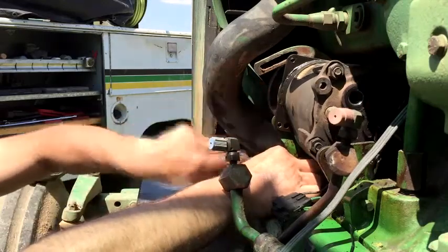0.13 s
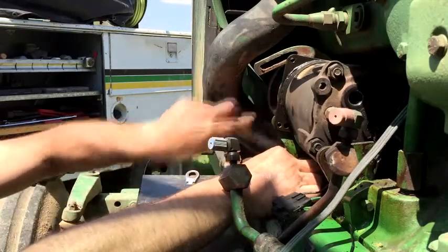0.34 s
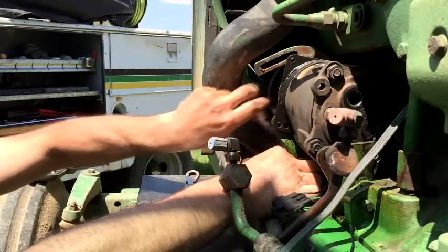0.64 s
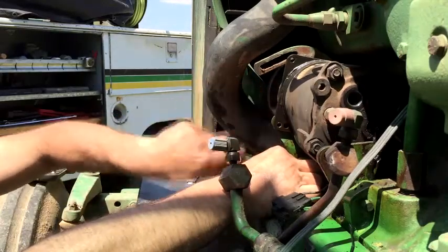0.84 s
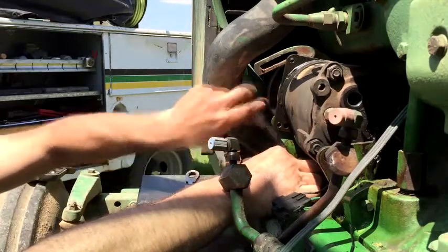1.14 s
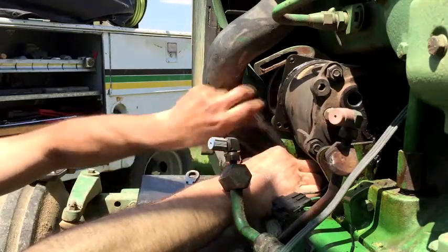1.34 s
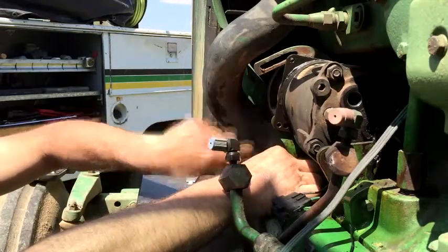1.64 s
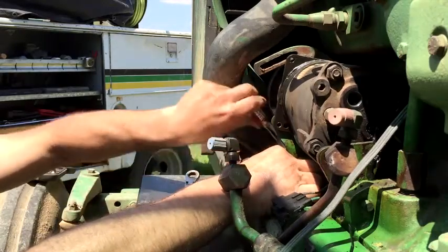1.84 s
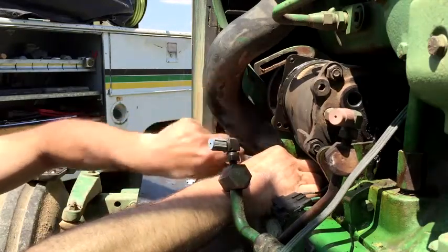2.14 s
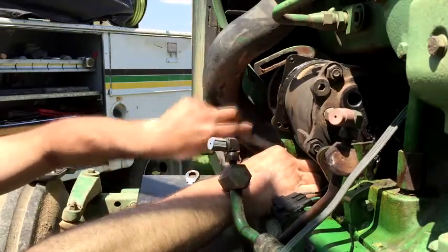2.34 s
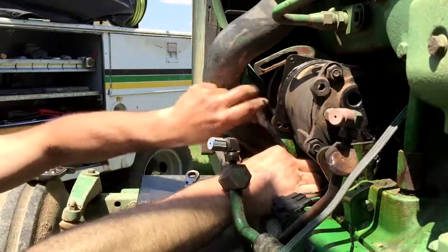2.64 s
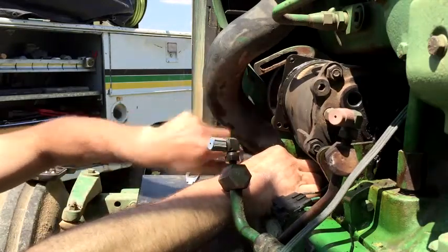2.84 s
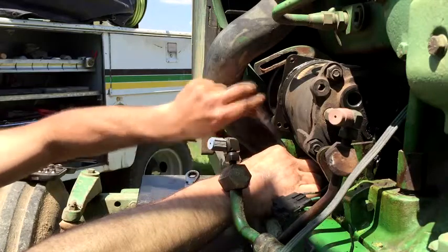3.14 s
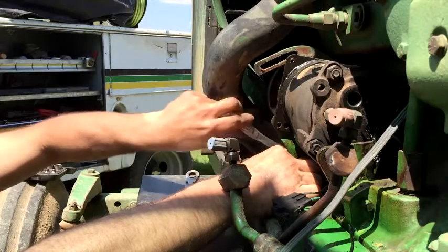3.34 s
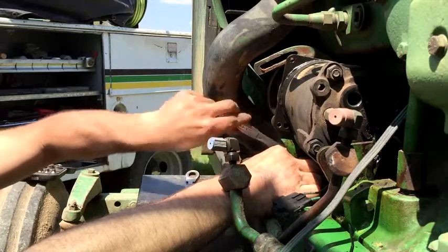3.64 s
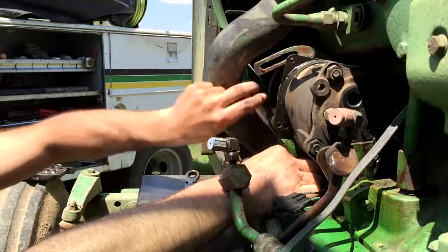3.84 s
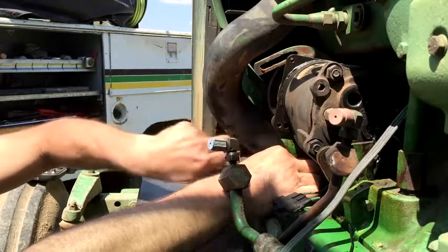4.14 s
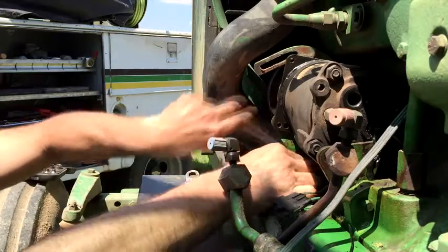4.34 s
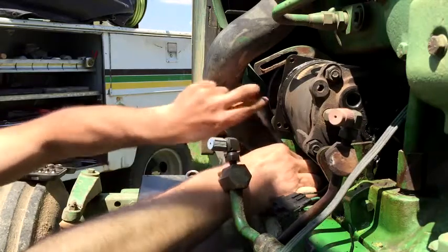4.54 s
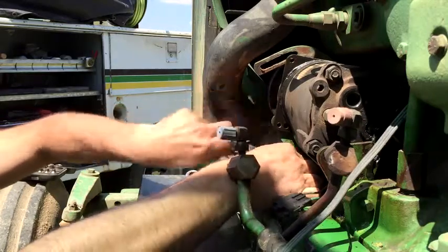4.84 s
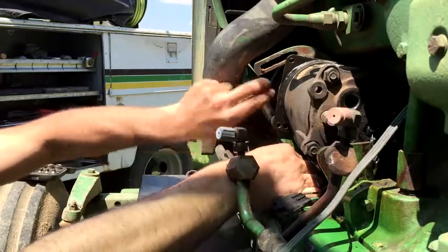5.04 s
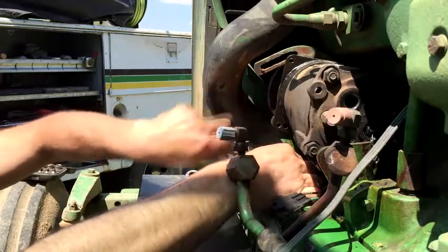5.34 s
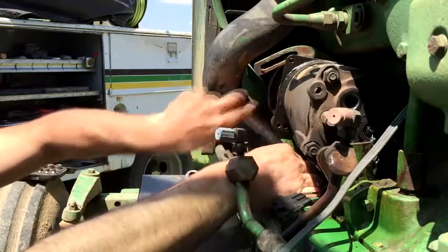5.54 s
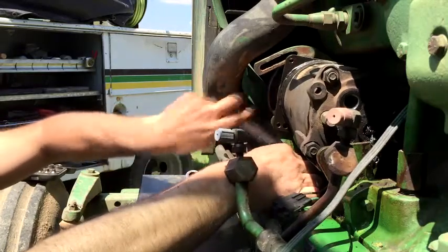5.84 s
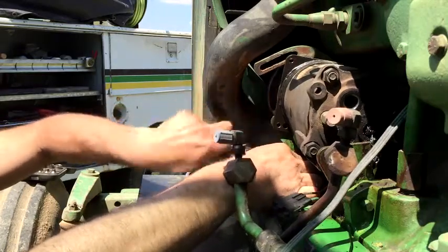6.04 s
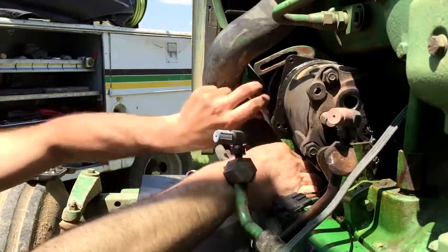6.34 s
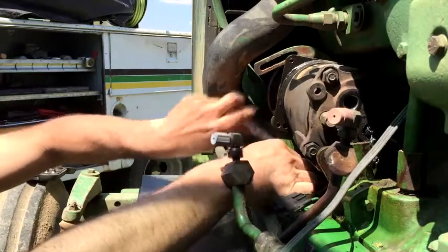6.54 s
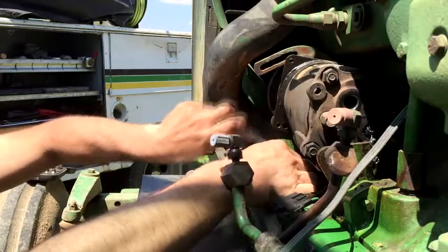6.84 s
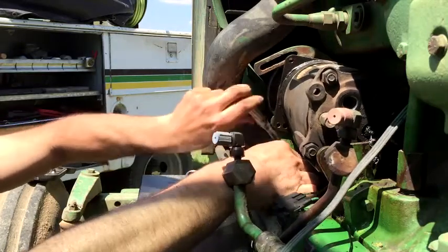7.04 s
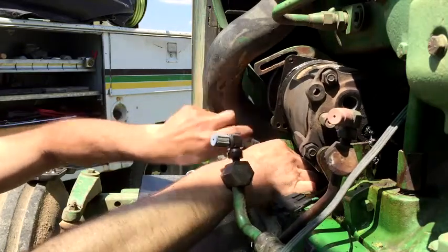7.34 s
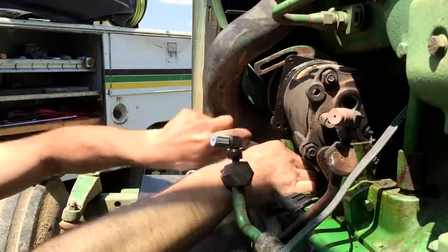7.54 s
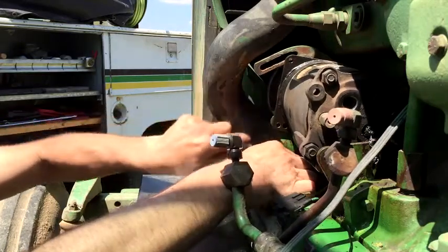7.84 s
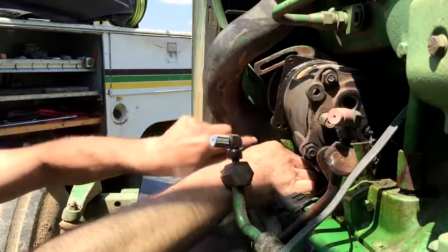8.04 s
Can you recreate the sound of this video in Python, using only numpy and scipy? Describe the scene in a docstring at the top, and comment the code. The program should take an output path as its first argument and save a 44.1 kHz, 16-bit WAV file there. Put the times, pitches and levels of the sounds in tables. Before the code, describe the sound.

A ratchet wrench works a bolt on a tractor engine close to the microphone, outdoors. Each swing gives a quick run of three or four crisp clicks, about every two thirds of a second, with dull knocks, small scrapes and metal clanks between. A faint motor hum fades early, then a distant vehicle drones past with soft tyre noise. Two louder ringing clanks come in the second half.

```python
"""A ratchet wrench works a bolt loose on a tractor engine, outdoors.
Each back swing drags the pawl over a few teeth, and each impact excites the modes of the steel head.
At the turns the socket clanks on the bracket, scrapes, or takes up the load with a dull knock.
Farther off a motor hum fades, and an eight-cylinder engine drones past in a wash of tyre noise,
its pitch lowered by the Doppler effect and its level throbbing by interference with an echo."""
import sys
import numpy as np
from scipy import signal
from scipy.fft import rfft, irfft
from scipy.io import wavfile
from scipy.ndimage import uniform_filter1d

SR = 44100
rng = np.random.default_rng(int(sys.argv[2]) if len(sys.argv) > 2 else 0)


def master_out(mix):
    """Clip the mix to full scale and print it as 16-bit PCM to the path in sys.argv[1]."""
    frames = np.transpose(np.atleast_2d(mix))
    ceiling = np.clip(frames, -1, 1)
    pcm = np.round(ceiling * 32767).astype(np.int16)
    wavfile.write(sys.argv[1], SR, pcm)


N = 361179
TIME = np.arange(N) / SR
HIT = np.arange(SR // 2) / SR  # t/s since an impact


def amp(db):
    """Amplitude ratio of a level in decibels."""
    return 10 ** (np.asarray(db) / 20)

def unit(x):
    """Normalisation to unit rms."""
    return x / np.sqrt(np.mean(x ** 2) + 1e-20)

def unit_attack(x):
    """Normalisation to unit rms over the first five milliseconds."""
    return x / np.sqrt(np.mean(x[:220] ** 2) + 1e-20)

def curves(rows):
    """Linear interpolation of a table's columns over time."""
    times, *columns = np.transpose(rows)
    return [np.interp(TIME, times, column) for column in columns]

def add(mix, at_s, sound):
    """Superposition of a sound from a given time on."""
    part = mix[max(round(at_s * SR), 0):][:len(sound)]
    part += sound[:len(part)]

def noise(spectrum, size=len(HIT)):
    """White noise shaped by a spectral envelope, at unit rms."""
    hz, db = np.transpose(spectrum)
    gain = amp(np.interp(np.log(np.fft.rfftfreq(size, 1 / SR) + 1), np.log(hz), db))
    return unit(irfft(rfft(rng.standard_normal(size)) * gain, size))

def band(x, hz, kind):
    """Fourth-order low-pass or high-pass filter."""
    return signal.sosfilt(signal.butter(4, np.clip(hz, 100, SR / 2 - 1), kind, fs=SR, output="sos"), x)

def drift(per_s):
    """Random fluctuation: straight lines between Gaussian values."""
    steps = rng.standard_normal(1024)
    return np.interp(TIME * per_s, np.arange(len(steps)), steps)

def swell(at_s, width_s):
    """Gaussian envelope with a peak of one."""
    return np.exp(-((TIME - at_s) / width_s) ** 2)

def rise(tau_s):
    """Exponential approach to full amplitude."""
    return 1 - np.exp(-HIT / tau_s)

def fade(t60):
    """Exponential decay by 60 dB in t60 seconds."""
    return amp(-60 * HIT / max(t60, 1e-3))

def mode(hz, t60, start_cycles=0):
    """Free vibration of a damped oscillator."""
    return fade(t60) * np.sin(2 * np.pi * (hz * HIT + start_cycles))

def ring(modes):
    """Modal superposition: the striking point sets the modes' shares; the grip detunes them a little."""
    hz, db, t60 = np.transpose(modes)
    db = db + 3 * rng.standard_normal(len(db))
    hz = hz * (1 + .01 * rng.standard_normal(len(hz)))
    contact = 1 - np.exp(-(HIT * hz.max() / 2) ** 2)  # low-pitched bodies start more softly
    return unit_attack(contact * sum(amp(d) * mode(f, t, rng.random()) for f, d, t in zip(hz, db, t60)))


def hum(hz=89.7, level_db=-38.5, fades_at_s=2.2, fade_db_per_s=12.5):
    """Periodic vibration of a far motor: a fundamental and a weak octave hold, then fade."""
    db = level_db - fade_db_per_s * np.maximum(TIME - fades_at_s, 0)
    phase = 2 * np.pi * np.cumsum(hz * (1 + .0038 * drift(4))) / SR
    return np.sqrt(2) * amp(db + drift(4)) * (np.sin(phase) + amp(-15) * np.sin(2 * phase))


# harmonics of the engine cycle; 8 is the firing note, unequal cylinders fill in: number, relative level/dB
EXHAUST_HARMONICS = [(4, -34.5), (5, -8.5), (6, -26), (7, -18.5), (8, -0.02), (9, -14), (10, -26.5),
                     (11, -24), (12, -29.5), (13, -27), (14, -38.5), (15, -32), (16, -19.5), (18, -37),
                     (19, -29.5), (20, -36.5), (21, -33.5), (24, -40)]
# swells and dips of single harmonics: number, t/s, half width/s, gain/dB
HARMONIC_SWELLS = [(5, 3.1, .8, -7), (5, 5.3, 1.4, 3.5), (8, 4.4, 0.28, 4), (8, 7.11, 0.54, 4),
                   (8, 7.85, 0.13, -4), (9, 2.3, 1.1, 10.5), (9, 5.9, 1.2, -20.5), (11, 3.42, 1.28, 20.5),
                   (16, 2.9, .7, -3), (16, 5.164, 0.39, 14.5), (16, 7.45, 0.48, 5.5), (18, 6.7, 0.65, 11),
                   (24, 6.78, 0.51, 12.5)]
# spectrum of the engine's rumble: f/Hz, relative level/dB
RUMBLE_SPECTRUM = [(20, -53.5), (30, -38), (42, -12.5), (65, 1.5), (85, 1), (125, 0.5), (170, -6.5),
                   (250, -12.5), (380, -28), (470, -28), (600, -44), (2000, -83)]

def engine(firing_hz=119, speed_m_per_s=25, distance_m=60, abreast_s=4.85, sound_m_per_s=343):
    """Doppler shift and spherical spreading of a passing exhaust; interference with an echo throbs."""
    along_m = speed_m_per_s * (TIME - abreast_s)
    range_m = np.hypot(along_m, distance_m)
    receding = along_m / range_m  # -1 far ahead, +1 far past
    heard_hz = firing_hz * (1 - receding * speed_m_per_s / sound_m_per_s)
    cycle = 2 * np.pi * np.cumsum(heard_hz * (1 + .002 * drift(7))) / SR / 8  # eight firings a cycle
    echo_phase = 2 * np.pi * (15.1 * receding - .26) / 8  # the extra path changes with the bearing
    screened = .5 - .5 * np.tanh((TIME - 2.39) / .086)  # hidden from the listener at first
    rearward_db = 5.5 * receding  # the tailpipe is louder from behind
    pass_db = 20 * np.log10(distance_m / range_m) + rearward_db - 13 * screened
    facing = swell(5.66, .77)  # the tailpipe is brightest just after it draws level
    drone = np.zeros(N)
    for k, db in EXHAUST_HARMONICS:
        start = 2 * np.pi * rng.random()
        above_firing = max(k - 8, 0)
        waver_db = (.5 - .054 * db) * unit(drift(1.303) + drift(11))  # weak harmonics waver more
        swell_db = sum(gain * swell(s, width) for line, s, width, gain in HARMONIC_SWELLS if line == k)
        bright_db = .55 * above_firing * facing
        direct = np.sin(k * cycle + start)
        echo = amp(-12.5 - 1.5 * above_firing) * np.sin(k * (cycle + echo_phase) + start)
        drone += np.sqrt(2) * amp(db + swell_db + waver_db + bright_db) * (direct + echo)
    rumble = amp(-38 + .2 * pass_db) * noise(RUMBLE_SPECTRUM, N)
    return amp(-25.5 + pass_db) * drone + rumble


# envelope of the road noise: t/s, relative level/dB
ROAD_ENVELOPE = [(0.0, -55), (0.34, -53.5), (1.71, -57), (3.65, -53.5), (4.22, -51), (5.75, -49),
                 (8.19, -56)]
# spectra of the tyres' low wash, high hiss and midrange roar: f/Hz, relative level/dB
WASH_SPECTRUM = [(100, -1), (300, 5.5), (400, -3.5), (520, -2.5), (650, 3), (780, 0), (1050, 4),
                 (1400, -4.5), (1800, -8.5), (2500, -16.5), (5000, -54)]
HISS_SPECTRUM = [(1000, 2), (2400, -9.5), (3500, 0.5), (5000, -6), (6500, -7.5), (8000, -12.5),
                 (9500, -12.5), (11000, -17), (15500, -17.5), (16500, -30.5)]
ROAR_SPECTRUM = [(500, -36.5), (800, -3), (1100, 5), (1350, -6), (1800, -10.5), (2400, -15), (3200, -19),
                 (4500, -24.5), (8000, -54)]

def road(waver_db=2.52):
    """Broadband tyre noise swells as the vehicle passes; moving air modulates each band's amplitude."""
    (level_db,) = curves(ROAD_ENVELOPE)
    wash = amp(level_db + 4.5) * noise(WASH_SPECTRUM, N)
    hiss = amp(-43 + .43 * level_db + .8 * drift(47)) * noise(HISS_SPECTRUM, N)
    roar = amp(-68 + 20.5 * swell(7.25, 1.7)) * noise(ROAR_SPECTRUM, N)  # comes after the engine
    bands = signal.stft(wash + hiss + roar, nperseg=1024)[2]
    patches = uniform_filter1d(rng.standard_normal(bands.shape), size=5, axis=0)  # smooth in frequency
    patches = unit(uniform_filter1d(patches, size=9, axis=1))  # and in time
    return signal.istft(bands * amp(waver_db * patches), nperseg=1024)[1][:N]


# impacts of the pawl on the teeth: t/s, relative level/dB
PAWL_IMPACTS = [(.095, -23.5), (.134, -25), (.1633, -26.5), (0.202, -27.5), (.8262, -26.5), (.856, -26.5),
                (0.8888, -24.5), (0.9307, -26), (1.503, -22), (1.533, -22), (1.559, -21.5), (1.5884, -22.5),
                (2.145, -27), (2.175, -24), (2.204, -28.5), (2.8284, -23.5), (2.861, -26.5), (2.8939, -27),
                (2.9693, -29.5), (3.451, -21.5), (3.4793, -21.5), (3.5227, -25), (4.0711, -24),
                (4.0977, -21.5), (4.124, -27), (4.1615, -23.5), (4.7486, -21.5), (4.787, -22),
                (4.8218, -22), (4.8614, -22.5), (5.3389, -24), (5.3846, -22), (5.4156, -22), (5.448, -23),
                (5.9391, -22.5), (5.9814, -21), (6.0243, -20.5), (6.6692, -23.5), (6.76, -21), (7.35, -20),
                (7.6787, -24)]
# brightness of successive swings, set by the grip: treble level/dB relative to the impact
SWING_BRIGHTNESS = [-13.5, -15, -17, -18, -15.5, -21.5, -15, -19, -16.5, -17.5, -16.5, -21, -20]
# spectrum of steel snapping on steel: f/Hz, relative level/dB
SNAP_SPECTRUM = [(200, -30), (900, -7), (2700, 0.5), (4000, 6.5), (5200, -5), (6000, -5), (7600, -8),
                 (9200, 1.5), (10400, -8), (11800, -0.5), (14000, -3.5), (15500, -11.5), (16500, -22)]
# modes of the ratchet head: f/Hz, relative level/dB, T60/s
HEAD_MODES = [(1110, -6, .03), (2020, 3, .021), (3300, -4, .016), (3760, -5, .022), (3950, -7, .035),
              (4160, -13, .055), (4370, -6, .04), (4660, -11, .045), (5360, -4, .022), (6380, -14, .028),
              (9950, -14, .035), (11150, -9, .028), (11450, -5, .026), (12300, -8, .016), (13250, -9, .022),
              (14620, -13, .03)]

def ratchet(swing_gap_s=.2, ping_hz=8135):
    """Impact excitation: the pawl drops and bounces, the head rings, the engine bay scatters the snap."""
    out = np.zeros(N)
    opens_swing = np.diff([s for s, _ in PAWL_IMPACTS], prepend=-1) > swing_gap_s
    swing_db = np.take(SWING_BRIGHTNESS, np.cumsum(opens_swing) - 1, mode="clip")
    for (s, db), first, treble_db in zip(PAWL_IMPACTS, opens_swing, swing_db):
        click = np.zeros(len(HIT))
        bounce = (rng.uniform(.001, .0028), rng.uniform(-7, 0))
        for delay_s, blow_db in [(0, 0), bounce]:
            snap = noise(SNAP_SPECTRUM) * (fade(.01) + amp(-19) * fade(.07))
            bay = amp(-14) * band(noise(SNAP_SPECTRUM), 6900, "low") * fade(.11)
            add(click, delay_s, amp(blow_db) * (unit_attack(snap + bay) + amp(1.5) * ring(HEAD_MODES)))
        click *= rise(.0002)
        body = amp(-9.5) * unit_attack(band(click, 6970, "low"))
        treble = band(click, 7100, "high") * (1 + fade(.004))  # brightest at first contact
        treble = amp(treble_db + 2.5 * first) * unit_attack(treble)  # a swing's first tooth snaps hardest
        ping = amp(-26 + 12 * first + 2 * rng.standard_normal()) * mode(ping_hz, t60=.033)  # pawl's note
        add(out, s, amp(db) * (body + treble + ping))
    return out


# the handle takes up the load: t/s, knock level/dB, relative thud level/dB, knock T60/s
LOAD_KNOCKS = [(.232, -34.5, -36, 0.14), (.248, -34, -41, 0.074), (0.378, -37.5, -51, 0.18),
               (.408, -43, -38, 0.11), (0.9489, -30.5, -36.5, 0.14), (1.757, -37, -28.5, 0.21),
               (1.773, -34, -29, 0.068), (2.377, -42, -51, 0.12), (2.408, -47, -47, 0.088),
               (3.083, -39, -35, 0.065), (3.716, -44, -39.5, 0.076), (4.1623, -28.5, -40, 0.1)]
# spectrum of a knock: f/Hz, relative level/dB
KNOCK_SPECTRUM = [(200, -0.5), (450, -2), (950, -0.5), (1600, -8.5), (2800, -16), (4500, -28), (8000, -37),
                  (16000, -18)]
# modes of the bracket and of the engine casting: f/Hz, relative level/dB, T60/s
BRACKET_MODES = [(397, -7.5, 0.057), (556, -17, 0.11), (705, -4.5, 0.09), (855, 2.5, 0.035),
                 (994, 1, 0.058), (1210, -3.5, 0.038), (1394, -2.5, 0.033), (1920, 1, 0.054)]
CASTING_MODES = [(159.3, 0.5, .14), (197.5, -2.5, .13), (231, 1.5, 0.16), (275, -13, 0.088),
                 (475, -7.5, 0.1)]

def handle():
    """Structure-borne sound: knocks pass through the bracket to the casting, whose low modes linger."""
    out = np.zeros(N)
    for s, db, thud_db, t60 in LOAD_KNOCKS:
        knock = unit_attack(noise(KNOCK_SPECTRUM) * fade(t60)) + amp(-17) * ring(BRACKET_MODES)
        knock = unit_attack(band(knock, 7000, "low"))
        thud = ring(CASTING_MODES)
        add(out, s, amp(db) * knock + amp(thud_db + 5) * thud / abs(thud).max())
    return out


# the socket strikes the bracket: t/s, relative level/dB, free ring level/dB, ring T60/s, rebound gain/dB
SOCKET_IMPACTS = [(.248, -43.5, -43, .05, -11), (0.5738, -31.5, -26, 0.053, -4),
                  (2.056, -46.5, -65, .03, -6), (3.412, -48.5, -57, .03, -2), (4.5192, -31, -27, .36, -14),
                  (5.2019, -41, -42, .03, 9.5), (5.569, -45, -64, .027, 6), (5.7103, -17.5, -30.5, 0.28, 1),
                  (6.3692, -21, -37, 0.13, -5.5), (6.949, -39, -60.5, .03, -13)]
# spectrum of the contact noise: f/Hz, relative level/dB
CLANK_SPECTRUM = [(200, -12), (600, -2), (1400, -3.5), (2300, 9.5), (4000, 7.5), (5000, -6.5), (8000, -12),
                  (13000, -23.5), (16000, -29)]
# modes of the socket: f/Hz, relative level/dB, T60/s
SOCKET_MODES = [(2060, 2, .026), (2620, 3, .025), (2920, -1, .03), (3280, -6, .03), (4100, -9, .025),
                (6350, -13, .02), (6690, -13, .04), (11270, -34, .09)]

def socket(rebound_s=.0038, ring_hz=2606, overtone_hz=11200):
    """Impact and rebound: the bracket clunks, and steel left undamped by the hand vibrates freely."""
    out = np.zeros(N)
    for s, db, ring_db, t60, rebound_db in SOCKET_IMPACTS:
        cutoff_hz = 20003 + 290 * db  # softer blows are duller
        for delay_s, blow_db in [(0, 0), (rebound_s, rebound_db)]:
            crack = noise(CLANK_SPECTRUM) * (fade(.018) + amp(-20) * fade(.08))
            blow = unit_attack(unit_attack(crack) + ring(SOCKET_MODES)) * rise(.00097)
            add(out, s + delay_s, amp(db + blow_db) * band(blow, cutoff_hz, "low"))
        clunk_db = min(db + 2, -26)  # the bracket follows the blow up to a limit
        add(out, s, amp(clunk_db) * ring(BRACKET_MODES))
        free_ring = mode(ring_hz, t60) + amp(-35) * mode(overtone_hz, .2 * t60)
        add(out, s, amp(ring_db) * free_ring)
    return out


# the socket shifts on the bolt: t/s, relative level/dB, duration/s
SOCKET_SLIPS = [(0.36, -52, .018), (0.372, -33.5, 0.032), (0.948, -50, 0.021), (4.049, -46.5, 0.059),
                (4.378, -58, 0.057), (5.1, -58, 0.056), (5.567, -41, 0.03), (5.605, -49, 0.029),
                (6.03, -38, 0.039), (6.945, -49.5, 0.035)]
# spectrum of steel sliding on steel: f/Hz, relative level/dB
FRICTION_SPECTRUM = [(500, -9), (2500, 1), (4200, 2), (5600, 4.5), (8000, -6), (12000, -13), (16000, -19)]

def scrapes(wrench_hz=4520):
    """Sliding friction: grit makes a short, rough noise and excites one mode of the wrench."""
    out = np.zeros(N)
    for s, db, length_s in SOCKET_SLIPS:
        stroke = np.clip(1 - HIT / length_s, 0, 1)
        roughness_db = 3.5 * unit(uniform_filter1d(rng.standard_normal(len(HIT)), size=40))
        grit = unit(amp(roughness_db)) * noise(FRICTION_SPECTRUM)
        note = amp(-10) * mode(wrench_hz, t60=.11)
        add(out, s, amp(db - 2) * rise(.0004) * (stroke * grit + note))
    return out


# contour of a faint squeak: t/s, f/Hz, relative level/dB
SQUEAK_CONTOUR = [(2.4, 1300, -53), (2.415, 1404, -50), (2.44, 1430, -55), (2.465, 1290, -47),
                  (2.5, 1130, -65)]

def squeak():
    """Frequency modulation: one thin tone arches up and down with a fast jitter."""
    hz, db = curves(SQUEAK_CONTOUR)
    sounding = (TIME > SQUEAK_CONTOUR[0][0]) & (TIME < SQUEAK_CONTOUR[-1][0])
    phase = 2 * np.pi * np.cumsum(hz * (1 + .014 * drift(380))) / SR
    return sounding * amp(db + 4.5) * np.sin(phase)


def scene():
    """Superposition of the near wrench and the distant traffic in one channel."""
    near = ratchet() + socket() + handle() + scrapes() + squeak()
    return (near + hum() + engine() + road())[None]

def record(dry, cutoff_hz=16600):
    """Band limiting by a linear-phase low-pass filter."""
    taps = signal.firwin(255, cutoff_hz, window=("kaiser", 8), fs=SR)
    return signal.oaconvolve(dry, taps[None], "same")


dry = scene()
out = record(dry)
master_out(out)
```